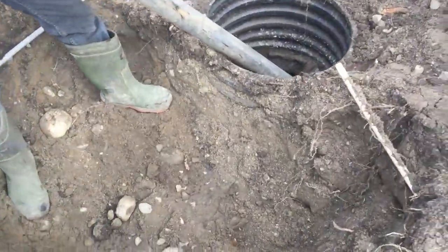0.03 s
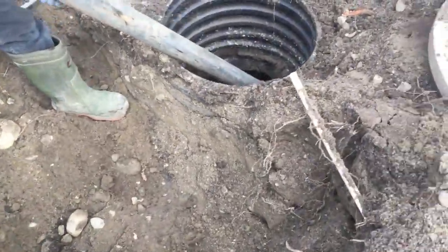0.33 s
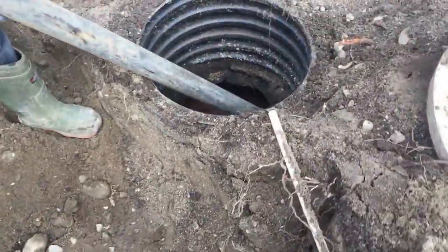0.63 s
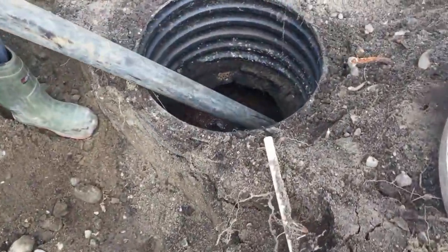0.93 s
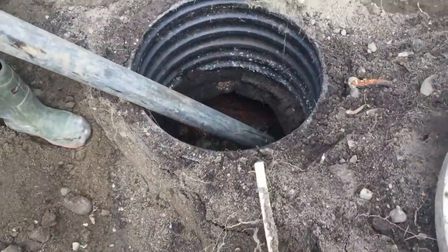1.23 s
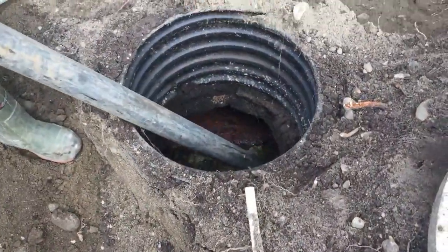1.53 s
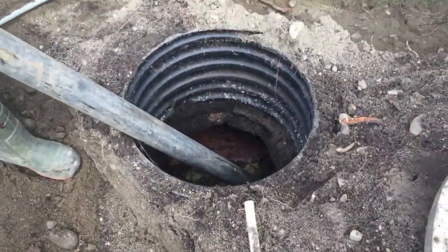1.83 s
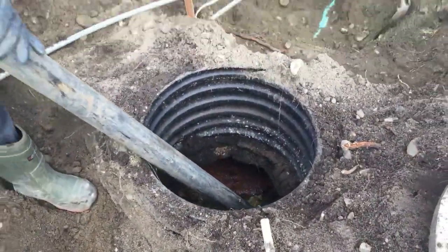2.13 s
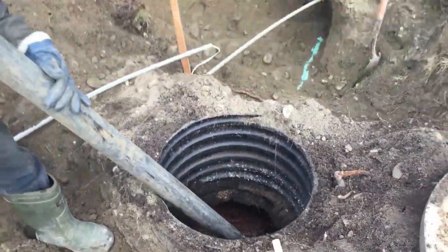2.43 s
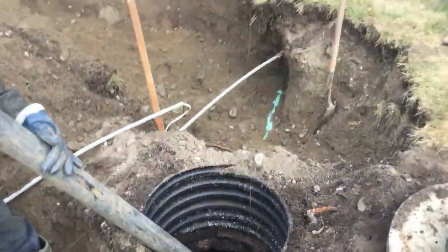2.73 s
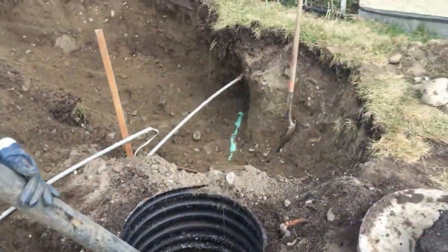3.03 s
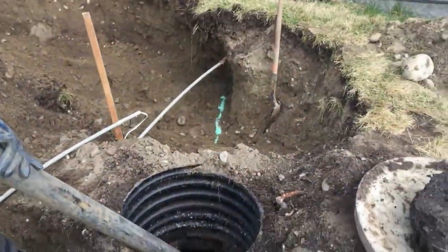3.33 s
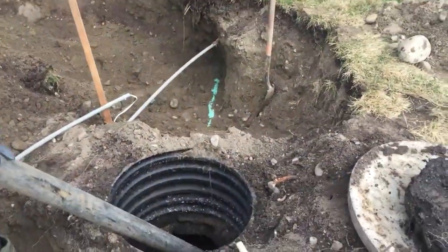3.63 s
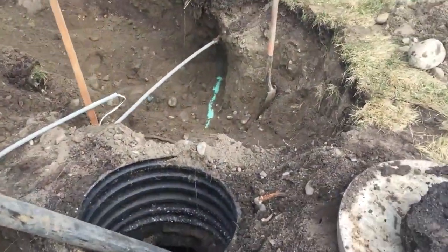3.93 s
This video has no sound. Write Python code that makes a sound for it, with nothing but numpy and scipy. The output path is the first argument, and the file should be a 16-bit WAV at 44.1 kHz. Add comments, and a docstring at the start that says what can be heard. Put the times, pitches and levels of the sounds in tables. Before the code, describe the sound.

A suction hose pulls mud and water out of an outdoor shaft, heard near the opening. A strong hissing rush gives way to gurgles, stone ticks and shorter surges, over the constant low drone and roar of a truck.

```python
"""Vacuum truck sucking up wet soil

A truck's engine drones and its blower roars while its hose sucks wet soil out of a ribbed
plastic shaft. Air and water rush at the nozzle in surges, with fine spray, slurps and ticks
of grit. The shaft rings with them, and the hose rumbles as it gulps."""
import sys
import numpy as np
from scipy import signal
from scipy.fft import rfft, irfft
from scipy.io import wavfile

SR = 44100
rng = np.random.default_rng(int(sys.argv[2]) if len(sys.argv) > 2 else 0)


def store_pcm(level_fs):
    """Save levels as 16-bit WAV."""
    pcm = np.round(np.clip(level_fs, -1, 1) * 32767).astype(np.int16)
    wavfile.write(sys.argv[1], SR, np.atleast_2d(pcm).T)


N = 176400
T = np.arange(N) / SR
FREQ = np.maximum(np.arange(N // 2 + 1) * SR / N, 1)

# Surges of air and water at the nozzle: time_s, level_db
RUSH_LEVELS = [(0, -30.5), (.08, -28), (.19, -27.5), (.39, -29.5), (.48, -27), (.67, -30.5), (.76, -33),
               (.82, -36.5), (1.0, -43.5), (1.13, -43.5), (1.2, -40), (1.33, -38.5), (1.5, -44.5),
               (1.9, -43), (2.28, -45.5), (2.49, -33.5), (2.55, -41), (2.62, -35), (2.7, -36),
               (2.77, -33.5), (2.95, -38.5), (3.12, -46.5), (3.3, -39.5), (3.45, -45.5), (3.65, -48.5),
               (3.92, -44.5), (4.0, -30)]
# Tone of that rush, from low to high: pitch_hz, relative_db
RUSH_TONE = [(250, -23), (600, -13), (1100, 0.5), (1800, 1.5), (2500, 1.5), (3200, -0.5), (4300, -3),
             (4900, -8.5), (5600, -7.5), (7000, -17.5), (8200, -25), (15500, -26.5)]
# Bursts of fine spray: time_s, level_db
SPRAY_LEVELS = [(0, -42), (.07, -41.5), (.25, -37), (.5, -40.5), (.77, -41.5), (.94, -47.5), (.99, -62),
                (1.43, -57), (1.48, -55), (1.67, -59), (1.77, -45.5), (1.81, -58), (1.91, -51), (1.98, -55),
                (2.26, -57), (2.31, -51.5), (2.5, -38.5), (2.55, -55), (2.62, -38), (2.69, -45.5),
                (2.76, -43.5), (2.93, -45), (3.17, -55.5), (3.27, -44.5), (3.35, -45.5), (3.43, -63),
                (3.92, -54.5), (3.98, -40.5)]
# Tone of the spray: pitch_hz, relative_db
SPRAY_TONE = [(1500, -25), (4000, 0), (7200, 4), (8100, -1.5), (9800, 0.5), (10500, -6.5), (12300, -2),
              (15500, -11.5)]
# Slurps at the nozzle: middle_s, fade_s, pitch_hz, width_hz, rise_octaves_per_s, level_db
SLURP_POCKETS = [(.105, 0.051, 1070, 450, 0.12, -33), (.11, .04, 2780, 2000, 0.056, -30.5),
                 (.2, 0.2, 5500, 1200, 0, -43.5), (.345, 0.094, 1090, 400, 0.2, -33.5),
                 (.51, .09, 2296, 700, 0.88, -31), (.67, .1, 3143, 1010, 0.96, -29.5),
                 (1.26, .09, 1014, 278, .7, -33.5), (1.32, .04, 1640, 550, 1, -39),
                 (1.42, .025, 6500, 3490, 0, -49), (1.61, .014, 3750, 1300, 0.12, -38.5),
                 (1.71, 0.011, 9400, 1500, 0, -50), (1.855, .04, 2430, 700, 0.021, -38.5),
                 (2.178, 0.014, 6800, 3200, 0.76, -47.5), (2.41, 0.1, 585, 90, 0, -39.5),
                 (2.625, 0.05, 1780, 1300, 0, -32.5), (2.763, 0.037, 2780, 2200, 0.048, -34.5),
                 (2.85, .2, 565, 130, 0.012, -43), (3.298, 0.023, 590, 35, .43, -33),
                 (3.305, 0.047, 1640, 300, 0.066, -37), (3.853, 0.13, 1300, 800, 0.054, -40)]
# Stones hitting the nozzle: start_s, strike_db, pitch_hz
GRIT_HITS = [(1.087, -42, 12000), (1.5705, -26, 4270), (1.6, -27, 3600), (2.0937, -24.5, 3900),
             (2.245, -30, 4200), (2.3433, -28, 4200), (2.3772, -27, 4200), (2.622, -29, 3020)]
# Hollow boom of the shaft: time_s, level_db
BOOM_LEVELS = [(0, -38), (.3, -33), (.66, -31), (.85, -43), (1.1, -40.5), (1.18, -36.5), (1.3, -30.5),
               (1.4, -37), (2.05, -48.5), (2.39, -30.5), (2.52, -43.5), (3.2, -38), (3.6, -46.5),
               (3.9, -35.5)]
# Water plugs knocking in the hose: middle_s, fade_s, pitch_hz, width_hz, rise_octaves_per_s, level_db
GULP_POCKETS = [(1.55, 0.129, 324, 80, 0.072, -40), (1.765, .018, 288, 150, 0.074, -35.5),
                (2.15, .045, 174, 70, 0.96, -30), (2.205, .032, 273, 70, 1.96, -35.5)]
# Rumble of the hose: time_s, level_db
RUMBLE_LEVELS = [(0, -44), (1.1, -33), (1.45, -31.5), (1.7, -28), (2.0, -30.5), (2.2, -26.5), (2.4, -33.5),
                 (2.9, -38), (3.12, -28.5), (3.6, -35.5), (4, -36)]
# Tone of the rumble: pitch_hz, relative_db
RUMBLE_TONE = [(25, -24), (60, -1), (90, -2), (160, -3.5), (220, -24), (330, -16), (600, -44), (1500, -65)]
# The engine's three lowest tones: time_s, first_db, second_db, third_db
DRONE_LEVELS = [(0.12, -16, -22, -29.5), (0.32, -16.5, -20.5, -31), (0.6, -16, -22, -28.5),
                (0.75, -16.5, -24.5, -33.5), (1.81, -17, -29.5, -32), (2.76, -16.5, -21, -36.5),
                (3.17, -16, -21.5, -28), (3.85, -16.5, -21, -34)]
# The engine's higher tones: multiple_of_firing_rate, level_db
ENGINE_OVERTONES = [(4, -39), (7, -53.5), (8, -48.5), (10, -51.5), (11, -53.5), (12, -48), (13, -50),
                    (14, -50.5), (16, -50.5), (19, -54.5)]
# Tone of the blower's roar: pitch_hz, relative_db
BLOWER_TONE = [(25, 2.5), (80, 13), (170, 5), (290, -4.5), (420, 1), (700, 1.5), (1200, -1.5), (2200, -8.5),
               (3300, -12), (4900, -22.5), (6500, -21.5), (8200, -28), (9800, -33), (10600, -39.5),
               (15500, -44)]


def suction(tone, levels):
    """Air and water rush into the nozzle, swelling and fading."""
    return shape_tone(wet_noise(), tone) * gain(curve(levels))


def wet_noise(drops_per_s=3600, drop_share=0.43, scatter_db=2.5, flutter_db=0.96):
    """Fluttering air mixed with a thick hail of drops, some louder than others."""
    hits = rng.random(N) < drops_per_s / SR
    sizes = gain(scatter_db * np.minimum(rng.exponential(size=N), 4))
    drops = hits * np.sign(noise()) * sizes
    mix = np.sqrt(1 - drop_share) * noise() + np.sqrt(drop_share) * normalize(drops)
    return mix * gain(flutter_db * wander(27))


def air_pockets(rows):
    """Pockets of air ring as water is torn into the hose; those that shrink rise in pitch."""
    out, water = np.zeros(N), wet_noise()
    for middle, fade, hz, width, rise, db in rows:
        near = np.abs(T - middle) < 3 * fade
        t = T[near] - middle
        pocket = resonate(np.roll(water, rng.integers(N)), hz, width)[near]
        shift_hz = hz * 2 ** (rise * t) - hz
        slide = np.exp(2j * np.pi * np.cumsum(shift_hz) / SR)
        swell = np.exp(-(t / fade) ** 2)
        ring = swell * np.real(signal.hilbert(pocket) * slide)  # moves the pitch by shift_hz
        out[near] += ring * gain(db) * np.sqrt(np.sum(swell ** 2) / np.sum(ring ** 2))
    return out


def grit(width_hz=1400, fade_s=0.0035):
    """Small stones tick against the nozzle, each at its own pitch."""
    out = np.zeros(N)
    for start, db, hz in GRIT_HITS:
        strike = gain(db) * (T >= start) * np.exp(-np.abs(T - start) / fade_s)
        out += resonate(strike * noise(), hz, width_hz)
    return out


def shaft_echoes(sound, ring_s=0.14, echo_db=-4.5, moves_per_s=2):
    """The ribbed walls throw back short echoes whose pattern shifts as the nozzle moves."""
    t, echoes = T[:SR // 4], 0
    for position in range(9):
        walls = rng.standard_normal(len(t)) * gain(-60 * t / ring_s)
        walls /= np.sqrt(np.sum(walls ** 2))
        blend = np.cos(np.pi / 2 * np.clip(T * moves_per_s - position, -1, 1))
        echoes += blend * signal.fftconvolve(sound, walls)[:N]
    return (sound + gain(echo_db) * echoes) / np.hypot(1, gain(echo_db))


def shaft_boom(pitch_hz=222, width_hz=34):
    """The column of air in the shaft rings with one hollow note."""
    boom = resonate(resonate(noise(), pitch_hz, width_hz), pitch_hz, width_hz)
    return normalize(boom) * gain(curve(BOOM_LEVELS))


def hose_rumble():
    """The hose rumbles low as it gulps."""
    return shape_tone(noise(), RUMBLE_TONE) * gain(curve(RUMBLE_LEVELS))


def engine(phase, bass_lead_rad=1.79, hose_hz=676, hose_width_hz=57.7):
    """One pulse per firing makes a firm low drone with wavering higher tones."""
    out = np.zeros(N)
    for k in (1, 2, 3):
        tone = np.sqrt(2) * np.cos(k * phase + bass_lead_rad * (k == 1))
        out += tone * gain(curve(DRONE_LEVELS, column=k) + 0.54 * wander(3.9))
    # Around 0.92 s the hose briefly rings along with the tones near its own pitch.
    ring_db = 8 * np.exp(-((T - 0.92) / 0.28) ** 2)
    for k, db in ENGINE_OVERTONES:
        closeness = np.exp(-((k * FIRING_HZ - hose_hz) / hose_width_hz) ** 2)
        offset = rng.uniform(0, 2 * np.pi) * (1 - closeness) + 0.34 * wander(7.7)
        tone = np.sqrt(2) * np.cos(k * phase + offset)
        out += tone * gain(db + closeness * ring_db + 2 * wander(2.06))
    return out


def blower(phase, level_db=-34, throb=0.07):
    """The truck's blower roars steadily, throbbing a little with each firing."""
    return gain(level_db) * shape_tone(noise() * (1 + throb * np.cos(phase)), BLOWER_TONE)


def gain(db):
    """Turn decibels into a number to multiply by."""
    return 10 ** (np.asarray(db) / 20)


def normalize(x):
    """Scale a signal so its typical swing is 1."""
    return x / np.std(x)


def curve(rows, column=1):
    """Join one column of a table with straight lines over time."""
    rows = np.array(rows)
    return np.interp(T, rows[:, 0], rows[:, column])


def noise():
    """Plain, even hiss."""
    return rng.standard_normal(N)


def wander(rate_hz):
    """A smooth random drift with a typical swing of 1."""
    return normalize(irfft(rfft(noise()) * np.exp(-(FREQ / rate_hz) ** 2) * (FREQ > 1), N))


def shape_tone(x, points):
    """Balance lows and highs by a tone table, then scale to a typical swing of 1."""
    hz, db = np.array(points).T
    return normalize(irfft(rfft(x) * gain(np.interp(np.log(FREQ), np.log(hz), db)), N))


def resonate(x, hz, width):
    """Make a sound ring near one pitch; the filter acts twice for steep sides."""
    return irfft(rfft(x) / (1 + .5j * hz / width * (FREQ / hz - hz / FREQ)) ** 2, N)


FIRING_HZ, SPEED_WAVER = 50.65, 0.0027


def scene(spray_in_shaft=0.93):
    """The nozzle down in the shaft and the truck nearby; a little spray skips the echoes."""
    phase = 2 * np.pi * np.cumsum(FIRING_HZ * (1 + SPEED_WAVER * wander(4.4))) / SR
    rush = suction(RUSH_TONE, RUSH_LEVELS)
    spray = suction(SPRAY_TONE, SPRAY_LEVELS)
    in_shaft = rush + spray_in_shaft * spray + air_pockets(SLURP_POCKETS) + grit()
    nozzle = shaft_echoes(in_shaft) + (1 - spray_in_shaft) * spray
    truck = engine(phase) + blower(phase)
    return (nozzle + truck + hose_rumble() + shaft_boom() + air_pockets(GULP_POCKETS))[None]


def record(dry, top_hz=15700):
    """Cut away the very highest treble."""
    return signal.sosfilt(signal.ellip(12, .1, 90, top_hz, fs=SR, output="sos"), dry)


dry = scene()
out = record(dry)
store_pcm(out)
```